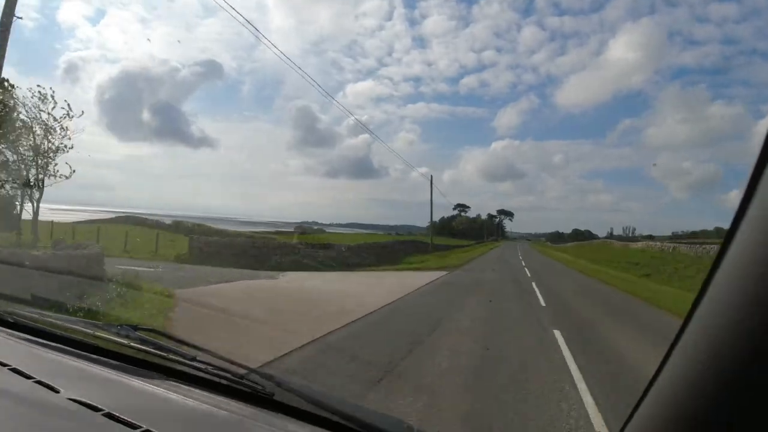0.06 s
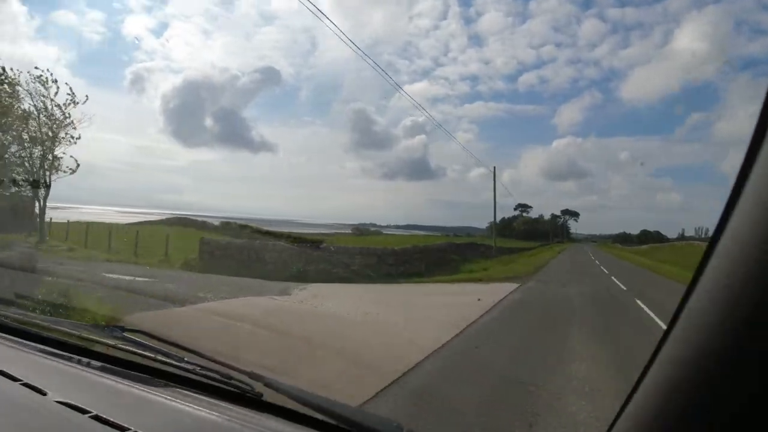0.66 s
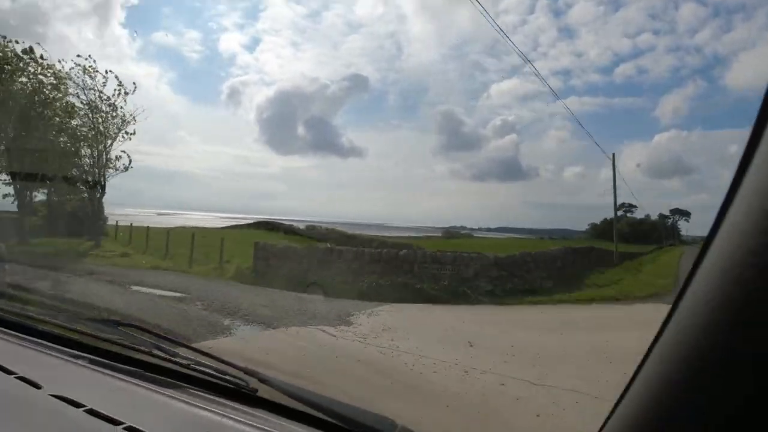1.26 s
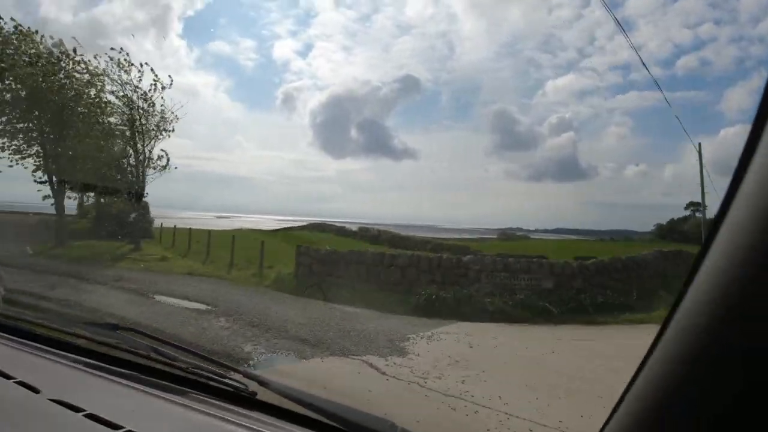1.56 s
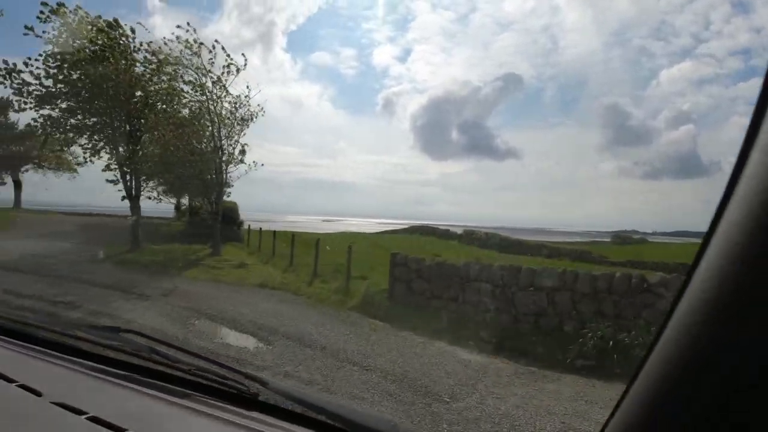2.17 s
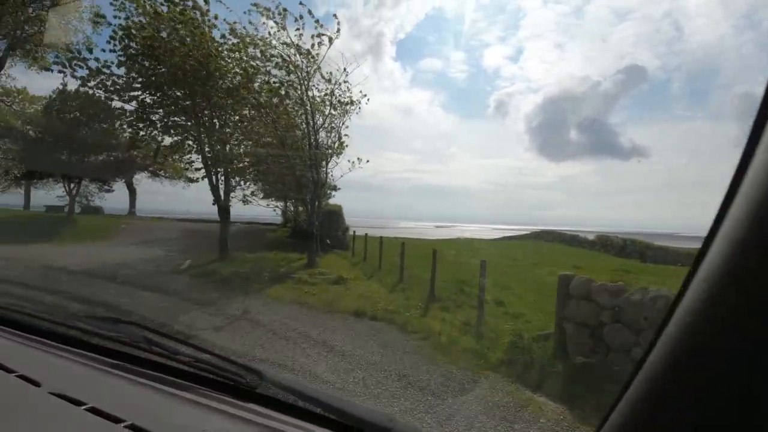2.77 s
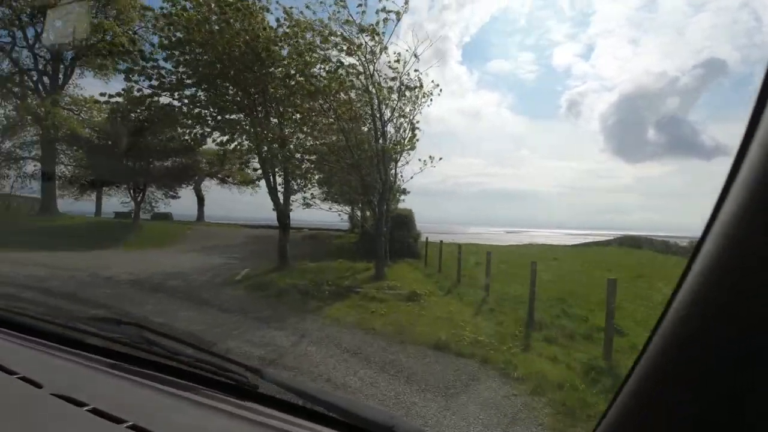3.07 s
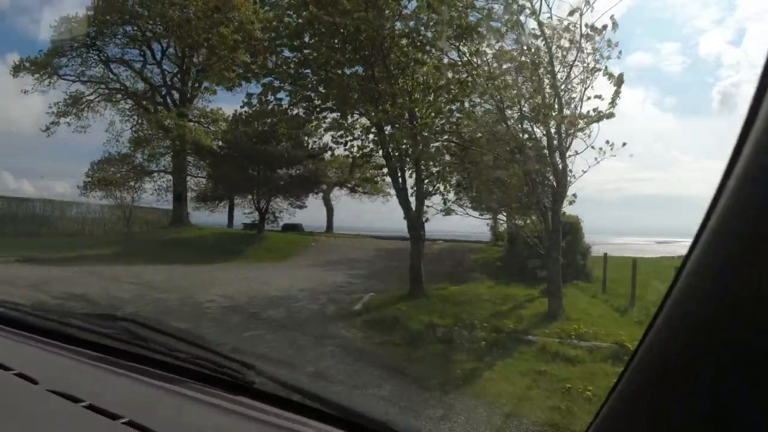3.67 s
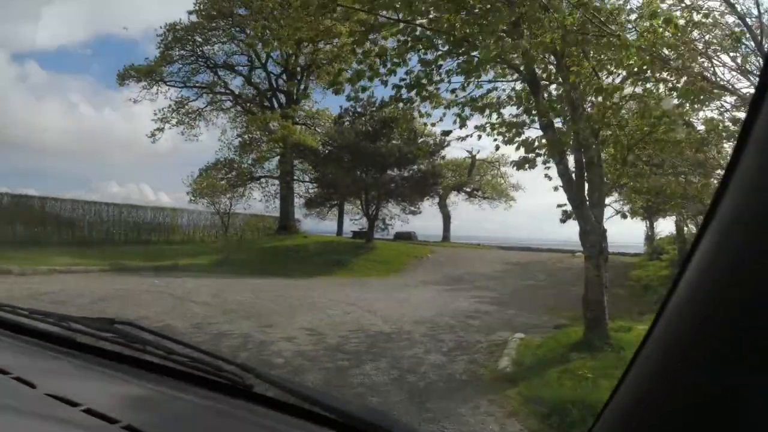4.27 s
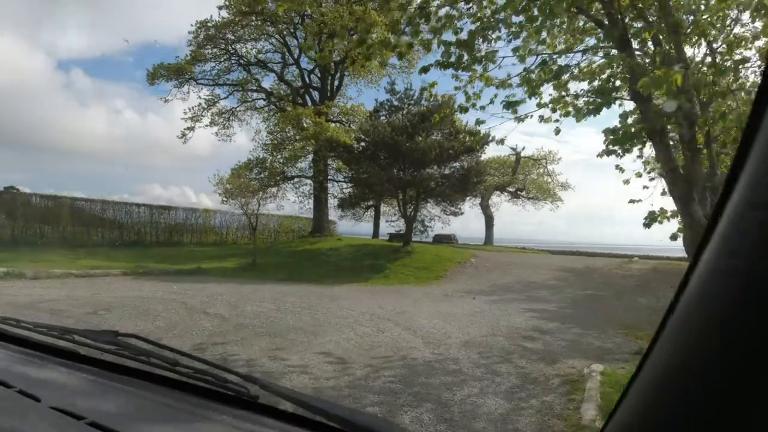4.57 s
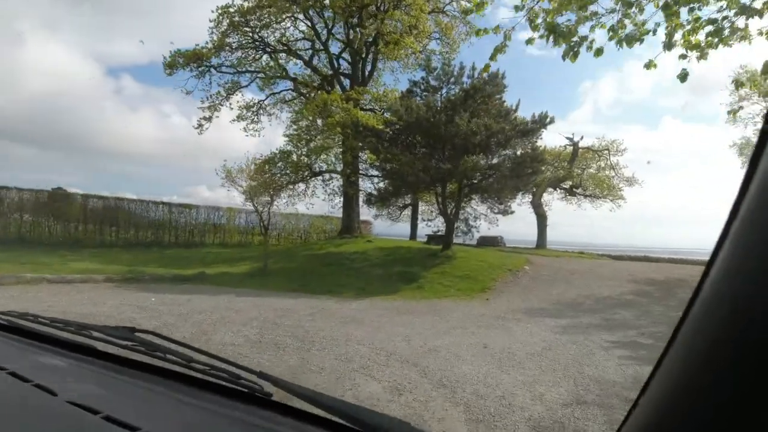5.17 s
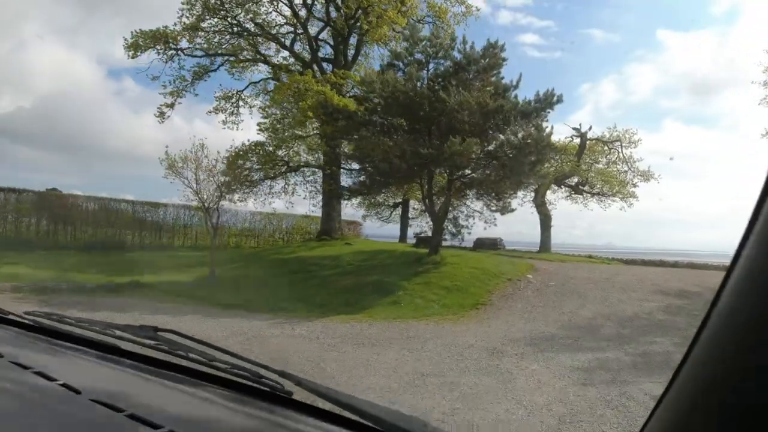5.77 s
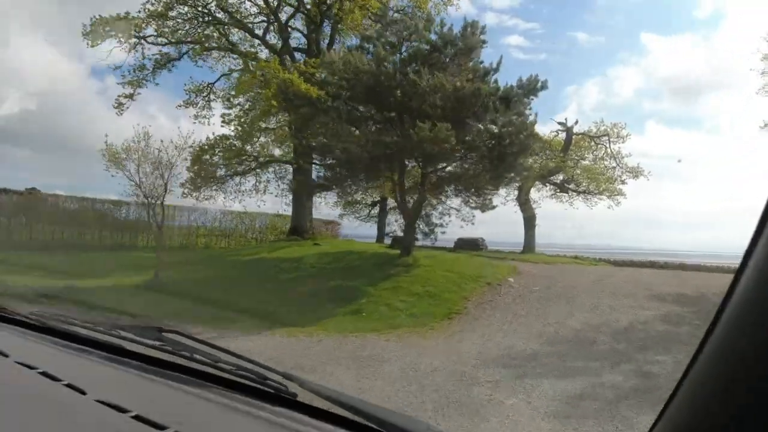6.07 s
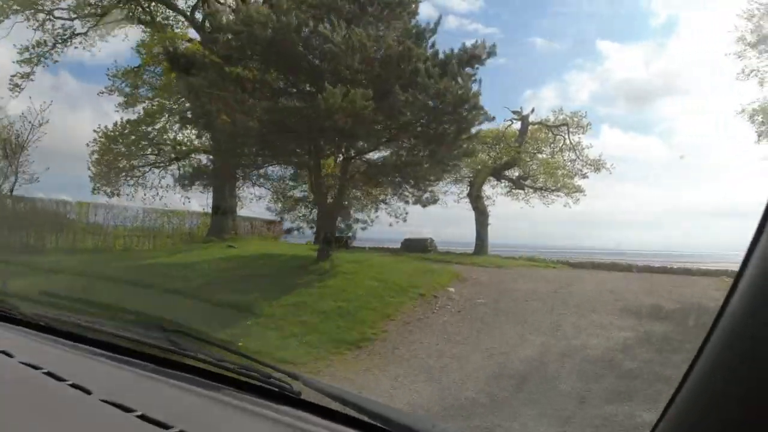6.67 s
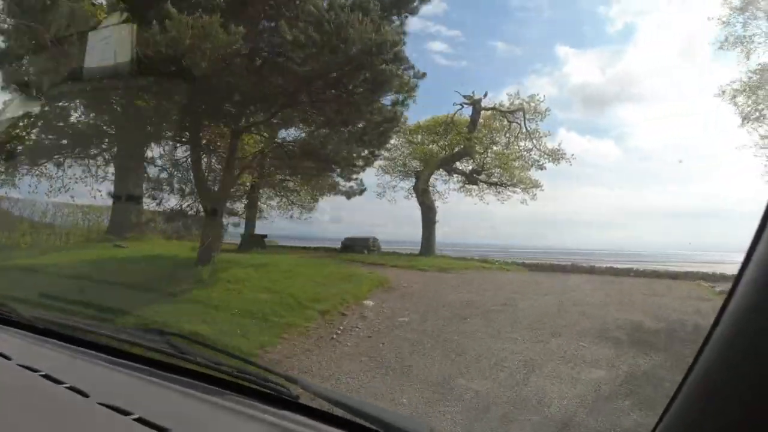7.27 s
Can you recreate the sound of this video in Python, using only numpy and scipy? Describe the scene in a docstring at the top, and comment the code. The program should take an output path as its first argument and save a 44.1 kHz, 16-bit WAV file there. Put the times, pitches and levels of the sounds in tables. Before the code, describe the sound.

A van rolls slowly from a road onto a gravel car park, heard from the dashboard. The idling engine hums under a low tyre rumble, with light grit and a few snapping stones. Then potholes boom through the body, the gravel crunches louder, stones knock on the underside and the trim squeaks. After the hardest knocks the engine hum sinks, while more jolts, faint chinks and a chattering loose fitting carry on.

```python
"""Inside a campervan that coasts off a tarmac road and rolls slowly over a gravel car park.
At first the idling engine hums under the tyre rumble, with light grit and a few snapping stones.
From 2.7 s potholes shake and boom the body; the gravel swells, stones knock on the underside,
small things rattle and the trim squeaks. After the hardest knocks, near 4.8 s, the engine hum
sinks, more jolts follow, small things chink and a loose fitting chatters in runs to the end."""
import sys
import numpy as np
from scipy import signal
from scipy.fft import rfft, irfft
from scipy.io import wavfile
from scipy.ndimage import uniform_filter1d

SR = 44100
rng = np.random.default_rng(int(sys.argv[2]) if len(sys.argv) > 2 else 0)


def master_out(mix):
    """Clip the mix to full scale and print it as 16-bit PCM to the path in sys.argv[1]."""
    frames = np.transpose(np.atleast_2d(mix))
    ceiling = np.clip(frames, -1, 1)
    pcm = np.round(ceiling * 32767).astype(np.int16)
    wavfile.write(sys.argv[1], SR, pcm)


N = 326781
TIME = np.arange(N) / SR
SNAP_RISE_S, EDGE_HZ = 0.0005, 15900  # attack of a stone's snap; upper limit of the band

# Spectrum of a snapping stone. Each row: frequency in Hz, spectral level in dB.
SNAP_SPECTRUM = [(2000, -6), (3500, -10.5), (5200, -9.5), (6300, -7.5), (7500, -5.5), (8500, -7.5),
                 (10000, -11), (12500, -21.5), (15500, -42)]


def road():
    """Random forcing: the tyres shake the floor, which drones at its resonances, over a faint hiss."""
    # Course of the rumble. Each row: time in seconds, level in dB.
    levels = [(0.0, -44.5), (2.62, -47), (2.79, -40), (3.12, -45.5), (3.44, -41.5), (4.93, -44),
              (5.24, -45.5), (5.59, -45), (7.41, -48)]
    # Spectra of the rumble and of the cabin's hiss. Each row: frequency in Hz, spectral level in dB.
    rumble_spectrum = [(12, -5.5), (22, 9.5), (32, 0), (50, -8), (70, -2.5), (100, -4), (150, -1),
                       (200, -6.5), (265, -10), (340, -14), (470, -21), (580, -23.5), (900, -33.5),
                       (1500, -64.5)]
    hiss_spectrum = [(200, 9), (2000, 5), (3500, -36), (6000, -19), (8000, -14.5), (10000, -16.5),
                     (12500, -16.5), (13500, -42), (16000, -29)]
    # Resonances of tyres and floor. Each row: frequency in Hz, width in Hz, lift in dB.
    drones = [(191.7, 6, 5), (222, 3.2, 1), (270, 12, 3.5), (370, 14, 5), (522, 52, 4)]
    level_db = curve(levels) + drift(10)
    rumble = evened(lifted(coloured(rng.standard_normal(N), rumble_spectrum), drones))
    hiss = coloured(rng.standard_normal(N), hiss_spectrum)
    return gain_of(level_db) * rumble + gain_of(-74.5) * hiss


def potholes():
    """Shock excitation: a wheel drops, the body heaves on its springs and the panels boom."""
    # Each row: start in seconds, boom length in seconds, pitch in Hz, boom in dB, heave in dB.
    jolts = [(0, 0.04, 62, -33, -30.5), (2.71, 0.025, 191.4, -24.5, -50), (2.732, 0.042, 237, -27.5, -41),
             (2.748, 0.049, 138.3, -23.5, -27), (2.79, 0.053, 191.7, -31, -28),
             (2.804, 0.17, 103, -29.5, -24.5), (2.899, 0.055, 65.4, -58, -25), (2.953, 0.04, 102, -55, -26),
             (3.301, 0.2, 193.2, -41, -53), (3.432, 0.063, 90.4, -31.5, -15), (3.713, 0.043, 102, -38, -19),
             (4.968, 0.057, 70, -27.5, -27), (5.1, 0.064, 143, -39, -19), (5.235, 0.05, 93.8, -28, -39),
             (5.25, 0.036, 173.7, -31, -18.5), (5.284, 0.14, 173.7, -43.5, -30),
             (5.396, 0.057, 169.2, -35.5, -50), (5.719, 0.019, 185, -38.5, -59),
             (6.08, 0.52, 176, -47, -29), (6.23, 0.069, 153.4, -36, -17.5), (6.288, 0.17, 50.7, -33.5, -26),
             (6.401, 0.1, 50, -36, -31)]
    # Modes of the body panels. Each row: frequency in Hz, width in Hz, level in dB.
    panels = [(67, 25, 17.5), (107, 64, -1.5), (187.5, 9.8, 7.5), (203, 8.5, 11.5), (267, 35, -14)]
    spring_hz, heave_s, heave_lag_s = 24.2, 0.1, 0.0309
    hop_hz, hop_gain = 47, gain_of(-14)  # the wheel hops faster and less strongly than the body
    sag_per_s = 0.99  # fall of the boom's pitch, as a share of its starting value
    out, t = np.zeros(N), np.arange(SR // 2) / SR
    for start, length, hz, boom_db, heave_db in jolts:
        since = TIME - start - heave_lag_s
        sway, hop = (sine(rate * since) for rate in (spring_hz, hop_hz))
        window = np.cos(np.pi * np.clip(since / heave_s, -0.5, 0.5)) ** 2
        out += gain_of(heave_db) * window * (sway + hop_gain * hop) / (1 + hop_gain / 2)
        envelope = swell(t, length, 0.25)
        tone = sine(hz * t * (1 - sag_per_s * t / 2))
        rumble = band(ringing(rng.standard_normal(len(t)), panels), hz, 0.65, 1.23)
        boom = (tone + 0.69 * rumble) * envelope
        add(out, start, gain_of(boom_db) * boom * np.linalg.norm(envelope) / np.linalg.norm(boom))
    return out


def gravel_db():
    """Common excitation: the moving gravel sets the level of grit, clatter, pebbles and buzz."""
    # Gravel moving under the tyres. Each row: time in seconds, level in dB.
    levels = [(0.0, -58.5), (0.52, -67.5), (1.38, -62.5), (2.56, -67.5), (2.85, -56.5), (3.26, -62.5),
              (3.63, -50), (3.8, -54.5), (3.98, -59), (5.34, -59), (5.7, -57), (5.92, -59.5), (7.41, -61.5)]
    return curve(levels)


def grit():
    """Shot noise: countless stones click under the tread, some smeared by the cabin's reverberation."""
    # Spectrum of the grit. Each row: frequency in Hz, spectral level in dB.
    spectrum = [(250, 10), (500, 12.5), (850, -2), (1200, 2), (1650, -5.5), (2400, -10), (3300, -11),
                (5300, -14.5), (7500, -23), (10000, -37), (14000, -43)]
    t = np.arange(2048) / SR
    smear = rng.standard_normal(len(t)) * np.exp(-t / 0.0064)
    coarse = signal.oaconvolve(grains(N, per_s=1100, spread_db=1.0), smear)[:N]
    fine = grains(N, per_s=9000, spread_db=0.98)
    level_db = gravel_db() + 5 + 3.65 * drift(31)
    return gain_of(level_db) * coloured(1.44 * evened(coarse) + fine, spectrum)


def snaps():
    """Impulse response: a pinched stone snaps out in its own bright modes and rings the underside."""
    # Each row: start in seconds, level in dB, relative level of the dull body in dB, pitch in Hz.
    stones = [(0.0807, -53.5, -9, 7640), (0.808, -55.5, -4, 7440), (1.181, -61, -14, 7250),
              (1.3927, -62.5, 12.5, 8900), (1.539, -54, -3, 8000), (2.265, -52.5, -12, 7600),
              (2.44, -58, -20, 7200), (2.4577, -38, -23, 7600), (2.637, -61, 0, 6950),
              (2.8541, -45.5, -34, 7900), (2.9563, -39.5, -19, 6020), (2.9936, -50, -3, 7500),
              (3.394, -59, 14, 6440), (3.723, -50.5, 0, 7400), (3.975, -44.5, -23, 6100),
              (3.984, -38.5, -24, 6360), (4.817, -41.5, 3.5, 5500), (4.8308, -34, 6, 5820)]
    # Modes of a stone. Each row: multiple of its pitch, level in dB.
    stone_modes = [(0.68, 2), (0.88, 5.5), (1, 1.5), (1.13, 3), (1.5, -0.5), (1.85, -4)]
    # Modes of the underside. Each row: frequency in Hz, level in dB, seconds to fall by 60 dB.
    underside = [(616, 1, 0.069), (910, -16.5, 0.069), (1003, -2, 0.068), (1170, -6, 0.051),
                 (1362, -4, 0.062), (1620, -9, 0.047), (1820, -6, 0.04), (2240, -4, 0.055),
                 (2534, -14, 0.034), (3350, -7, 0.04)]
    # Spectrum of the dull thud. Each row: frequency in Hz, spectral level in dB.
    thud_spectrum = [(250, -39), (480, -4), (620, -15), (900, -4), (1400, -9.5), (2300, -3), (3000, -22),
                     (5000, -17.5), (9000, -32)]
    out, t = np.zeros(N), np.arange(8192) / SR
    for start, db, body_db, pitch_hz in stones:
        crack_noise, body_noise = rng.standard_normal((2, len(t)))
        modes = [(pitch_hz * ratio * rng.uniform(0.933, 1.03), 400, mode_db)  # no two stones are alike
                 for ratio, mode_db in stone_modes]
        crack = coloured(ringing(crack_noise, modes), SNAP_SPECTRUM)
        crack *= strike(t, SNAP_RISE_S, 0.0076, -15.5, 0.014)
        cabin_wash = gain_of(-32.5) * coloured(body_noise, SNAP_SPECTRUM) * swell(t, 0.042, 0.7)
        thud = coloured(body_noise, thud_spectrum) * strike(t, 0.00025, 0.0097, -6.5, 0.013)
        ring = sum(gain_of(mode_db - 60 * t / t60) * sine(hz * t) for hz, mode_db, t60 in underside)
        body = 0.61 * thud + 0.59 * ring * (1 - np.exp(-t / SNAP_RISE_S))
        add(out, start, gain_of(db) * (crack + cabin_wash + gain_of(body_db) * body))
    return out


def knocks():
    """Damped vibration: a stone hits the underside with a rasp and excites the panel's main mode."""
    # Each row: start in seconds, level in dB, frequency of the mode in Hz.
    hits = [(1.4256, -36, 1010), (1.626, -46.5, 1430), (2.081, -54, 795), (2.474, -41, 1000),
            (2.635, -42.5, 1066), (2.671, -46.5, 910), (3.032, -44.5, 1000), (3.135, -55, 950),
            (3.212, -50, 830), (3.395, -45, 1250), (3.441, -45, 1100), (3.532, -43, 1404),
            (3.621, -38.5, 2220), (3.672, -40, 1740), (3.691, -51, 1460), (3.9518, -45, 1010),
            (4.02, -37.5, 940), (4.047, -40.5, 916), (4.072, -41, 2000), (4.219, -41, 796), (4.3, -49, 943),
            (4.51, -42.5, 965), (4.551, -49, 900), (4.682, -51, 940), (4.712, -45, 1420), (4.819, -30, 870),
            (4.833, -28, 1377), (4.868, -41, 1570), (4.428, -47, 1640), (5.432, -43, 1580),
            (5.446, -38, 1600), (5.86, -45, 1590), (5.874, -41.5, 1740), (7.007, -56, 1690),
            (7.06, -42, 1630), (7.204, -50, 1700), (7.365, -50, 1740)]
    out, t = np.zeros(N), np.arange(8192) / SR
    for start, db, hz in hits:
        rasp = band(rng.standard_normal(len(t)), hz, 1.0, 1.5) * strike(t, 0.0021, 0.0022, -17.5, 0.044)
        ring = np.sin(2 * np.pi * hz * t) * strike(t, 0.00067, 0.0039, -32, 0.029)
        add(out, start, gain_of(db) * (rasp + gain_of(2) * ring))
    return out


def chatter():
    """Intermittent contact: a loose fitting buzzes, rocks on its seat and clacks once in each swing."""
    # Each row: first and last clack of a run in seconds, then their levels in dB.
    runs = [(0.016, 0.207, -46, -57.5), (1.574, 1.722, -52.5, -61.5), (3.305, 3.367, -54.5, -51),
            (3.426, 3.581, -45, -46), (3.629, 3.69, -43.5, -49), (4.014, 4.121, -45.5, -47.5),
            (4.445, 4.644, -55, -55), (4.731, 4.773, -57.5, -54.5), (5.001, 5.292, -55.5, -54),
            (5.375, 5.634, -52, -46), (5.753, 5.807, -51, -47.5), (5.856, 5.997, -46.5, -52),
            (6.152, 6.209, -54.5, -54), (6.363, 6.416, -55.5, -59), (6.554, 6.61, -51, -51.5),
            (6.75, 6.89, -56, -55.5), (7.001, 7.104, -51.5, -47.5), (7.234, 7.378, -55.5, -62.5)]
    # Modes of the fitting. Each row: frequency in Hz, width in Hz, level in dB.
    modes = [(1185, 85, 3.5), (1385, 210, -1.5), (1641, 71, 1), (2145, 77, 0.5), (2850, 380, -7.5),
             (4880, 740, -9.5), (5340, 160, -4.5), (6960, 240, -14.5)]
    rocks_per_s, landing_s, variation = 19.6, 0.002, 0.69
    t = np.arange(4096) / SR
    contact = gain_of(gravel_db() - 9.5 + 2 * drift(27)) * rng.standard_normal(N)  # the buzz
    shared_ring = evened(irfft(np.exp(2j * np.pi * rng.random(len(t) // 2 + 1))))
    for first, last, first_db, last_db in runs:
        for along in np.linspace(0, 1, round((last - first) * rocks_per_s) + 1):
            envelope = 1.82 * strike(t, 0.0013, 0.0067 * rng.uniform(0.91, 1.0), -18.5, 0.047)
            clack = evened(shared_ring + variation * rng.standard_normal(len(t)))
            db = first_db + along * (last_db - first_db)
            add(contact, first + along * (last - first) + landing_s, gain_of(db) * envelope * clack)
    return np.std(contact) * band(ringing(contact, modes), 2580, 2.37, 1.63)


def crunches():
    """Granular slip: a patch of gravel gives way in a dense shower of clicks."""
    # Each row: start in seconds, length in seconds, centre frequency in Hz, level in dB.
    patches = [(0, 0.051, 3770, -57), (0.87, 0.024, 2750, -57.5), (0.995, 0.022, 3220, -66),
               (1.386, 0.1, 1640, -54), (1.806, 0.018, 3720, -58.5), (1.869, 0.044, 4000, -59.5),
               (2.724, 0.028, 3800, -50.5), (2.728, 0.036, 1040, -50), (3.126, 0.074, 786, -49.5),
               (3.409, 0.1, 860, -50), (3.516, 0.046, 740, -55), (3.613, 0.054, 2910, -48.5),
               (3.479, 0.088, 2400, -69), (3.619, 0.1, 1050, -49), (4.282, 0.06, 1030, -57.5),
               (5.132, 0.098, 2550, -58.5), (5.439, 0.13, 1680, -43), (5.463, 0.27, 1790, -51.5),
               (7.047, 0.036, 1560, -54)]
    out, t = np.zeros(N), np.arange(SR // 2) / SR
    for start, length, hz, db in patches:
        shower = band(grains(len(t), per_s=2000, spread_db=0.67), hz, 0.98, 2.57)
        add(out, start, gain_of(db) * shower * swell(t, length, 0.31))
    return out


def clatter():
    """Convolution: flung stones tap four wheel arches, each with its own dull impulse response."""
    hits_per_s, ring_s = 24, 0.006
    t = np.arange(2048) / SR
    hits = rng.uniform(0.24, 1, (4, N)) * (rng.random((4, N)) < hits_per_s / SR)
    rings = rng.standard_normal((4, len(t))) * np.exp(-t / ring_s)
    taps = signal.oaconvolve(hits, rings, axes=1).sum(0)[:N]
    return gain_of(gravel_db() - 4.5) * band(taps, 790, 0.93, 1.84)


def engine():
    """Harmonic series: the idling engine sounds wavering orders of its firing rate, beside two hums."""
    # Idle speed. Each row: time in seconds, firings per second.
    idle = [(0, 29), (.5, 29.2), (1.1, 28.6), (1.8, 28.3), (2.5, 28.4), (4.3, 28), (7.41, 28.6)]
    # Course of the hum in the cabin. Each row: time in seconds, level in dB.
    levels = [(0, -47.5), (1.8, -48.5), (2.5, -48), (4.3, -50), (5.6, -55), (7.41, -53.5)]
    # Engine orders. Each row: multiple of the firing rate, relative level in dB.
    orders = [(1, -5), (2, -5.5), (3, 1), (4, -3.5), (5, -9), (7, -15), (8, -10.5), (16, -20), (17, -16.5)]
    # Steady tones beside the orders. Each row: frequency in Hz, relative level in dB.
    hums = [(192.5, -10.5), (480.5, -24.5)]
    firings = np.cumsum(curve(idle) * (1 + 0.003 * drift(6))) / SR
    hum = sum(gain_of(db + 1.5 * drift(0.81)) * sine(order * firings) for order, db in orders)
    hum += sum(gain_of(db) * np.sin(2 * np.pi * hz * TIME + 1.37 * drift(2.2)) for hz, db in hums)
    return gain_of(curve(levels)) * hum


def squeaks():
    """Stick-slip friction: trim rubs on trim, its unsteady pitch climbing as the rub tightens."""
    # Each row: start in seconds, length in seconds, pitch in Hz, level in dB, ratio of scrape to tone.
    rubs = [(0.404, 0.037, 1600, -68.5, 1.9), (1.406, 0.14, 1765, -62, 0.52), (1.41, 0.057, 2390, -66, 1.2),
            (1.545, 0.034, 4780, -63, 0.28), (3.037, 0.11, 2310, -71, 1.8), (3.303, 0.19, 2300, -69, 1.5),
            (3.419, 0.023, 560, -50, 0.51), (3.533, 0.037, 473, -40.5, 0.48),
            (3.602, 0.032, 516, -48, 0.31), (3.78, 0.032, 710, -50.5, 0.4), (3.96, 0.044, 2460, -62, 2.1),
            (4.058, 0.041, 4770, -71, 3), (5.465, 0.036, 2407, -47.5, 0.64)]
    climb_hz_per_s, wobble_share, stutter_db = 820, 0.003, -0.5
    out, t = np.zeros(N), np.arange(SR // 2) / SR
    for start, length, hz, db, scrape in rubs:
        envelope = swell(t, length, 0.45) ** 2 * gain_of(stutter_db * drift(90, size=len(t)))
        wobble = evened(uniform_filter1d(rng.standard_normal(len(t)), size=200))
        pitch_hz = hz * (1 + wobble_share * wobble) + climb_hz_per_s * t
        tone = np.sin(2 * np.pi * np.cumsum(pitch_hz) / SR)
        rasp = band(rng.standard_normal(len(t)), hz, 0.058, 1.1)
        add(out, start, gain_of(db) * envelope * (tone + scrape * rasp))
    return out


def rattles():
    """Repeated impact: small loose things bounce unevenly and scrape, exciting their resonances."""
    # Each row: start of a shake in seconds, length in seconds, level in dB.
    shakes = [(0.936, 0.027, -69), (3.388, 0.039, -47.5), (3.43, 0.056, -58), (3.655, 0.061, -56.5),
              (5.311, 0.056, -58), (6.254, 0.085, -54), (6.467, 0.058, -57), (6.789, 0.046, -60),
              (7.132, 0.043, -62.5)]
    # Modes of the loose things. Each row: frequency in Hz, width in Hz, level in dB.
    modes = [(1750, 510, 3), (2760, 260, 2), (3510, 220, -1), (4330, 360, 0.5), (5030, 260, 3.5),
             (6400, 500, -10), (8240, 600, -15)]
    bounces_per_s, scrape = 230, 0.8
    out, t = np.zeros(N), np.arange(SR // 2) / SR
    for start, length, db in shakes:
        bounces = np.floor(bounces_per_s * t + 0.44 * drift(120, size=len(t)))
        landings = np.diff(bounces, prepend=0) != 0
        ticks = evened(landings * rng.uniform(0.49, 1, len(t)) * rng.choice([-1, 1], len(t)))
        shaken = (ticks + scrape * rng.standard_normal(len(t))) * swell(t, length, 0.27)
        add(out, start, gain_of(db) * np.std(shaken) * band(ringing(shaken, modes), 3400, 1.6, 1.6))
    return out


def chinks():
    """Inharmonic modes: small hard things touch and give a thin, high chink."""
    # Each row: start in seconds, pitch in Hz, level in dB.
    touches = [(4.868, 11200, -72), (5.02, 9990, -78), (5.344, 8650, -65.5), (5.412, 8680, -68),
               (5.478, 10950, -76), (5.722, 5450, -67), (6.14, 5684, -64.5), (6.138, 9560, -72),
               (6.192, 5670, -60), (6.541, 5620, -62.5), (7.063, 5500, -58.5)]
    # Modes of a chink. Each row: multiple of the pitch, relative level in dB.
    modes = [(1, -1), (1.56, -16), (1.92, -22), (2.555, -28)]
    out, t = np.zeros(N), np.arange(SR // 4) / SR
    envelope = swell(t, length=0.03, peak_share=0.54) ** 2
    for start, pitch_hz, db in touches:
        for ratio, mode_db in modes:
            hz = pitch_hz * ratio
            scrape = band(rng.standard_normal(len(t)), hz, 0.03, 1.1)
            tone = evened(np.sin(2 * np.pi * hz * t) + 1.1 * scrape)
            add(out, start, (hz < EDGE_HZ) * gain_of(db + mode_db) * tone * envelope)
    return out


def pebbles():
    """Random arrivals: small stones tick faintly and independently between the big snaps."""
    ticks_per_s, loudest_db, range_db = 10, -3, 18  # levels relative to the gravel
    out, t = np.zeros(N), np.arange(2048) / SR
    for place, weakness in rng.random((round(ticks_per_s * N / SR), 2)):
        tick = coloured(rng.standard_normal(len(t)), SNAP_SPECTRUM)
        tick *= strike(t, SNAP_RISE_S, 0.007, -13, 0.02)
        add(out, place * N / SR, gain_of(loudest_db - range_db * weakness) * tick)
    return gain_of(gravel_db()) * out


def cabin(x):
    """Cavity resonance: the van's interior favours a few tones and so sounds hollow."""
    # Each row: frequency in Hz, width in Hz, lift in dB.
    resonances = [(753, 113, 6.5), (907, 95, 6), (1475, 220, 4.5), (1626, 190, 2), (2288, 49, 6),
                  (2480, 73, 2.5), (2614, 43, 5.5)]
    return gain_of(-5.5) * lifted(x, resonances)


def gain_of(db):
    """Decibels to an amplitude ratio."""
    return 10 ** (np.asarray(db) / 20)


def evened(x):
    """Normalisation to rms 1."""
    return x / np.sqrt(np.mean(x ** 2) + 1e-20)


def add(mix, start, sound):
    """Superposition: a sound joins the mix at a start in seconds."""
    part = mix[max(round(start * SR), 0):][:len(sound)]
    part += sound[:len(part)]


def curve(points):
    """Linear interpolation of (seconds, value) points over the scene."""
    return np.interp(TIME, *np.transpose(points))


def sine(cycles):
    """Harmonic motion with a random starting phase."""
    return np.sin(2 * np.pi * (cycles + rng.random()))


def drift(rate_hz, size=N):
    """Random fluctuation: low-passed noise of rms about 1."""
    white = rng.standard_normal(N)
    return evened(irfft(rfft(white) / (1 + (bins(white) / rate_hz) ** 4), N))[:size]


def grains(size, per_s, spread_db):
    """Poisson process: sparse clicks of random sign and size."""
    sizes = gain_of(spread_db * np.minimum(rng.exponential(1, size), 4)) * rng.standard_normal(size)
    return evened(sizes * (rng.random(size) < per_s / SR))


def strike(t, rise_s, decay_s, tail_db, tail_s):
    """Double exponential decay: a quick rise, a quick fall and a weaker tail."""
    return (1 - np.exp(-t / rise_s)) * (np.exp(-t / decay_s) + gain_of(tail_db) * np.exp(-t / tail_s))


def swell(t, length, peak_share):
    """Critically damped pulse: it reaches 1 at a share of its length, then dies away."""
    u = t / (length * peak_share)
    return u * np.exp(1 - u)


def bins(x):
    """Fourier frequencies of x, raised by 1 Hz to keep their logarithms finite."""
    return np.fft.rfftfreq(len(x), 1 / SR) + 1


def coloured(x, points):
    """Spectral shaping through (Hz, dB) points, at rms 1."""
    hz, db = np.transpose(points)
    return evened(irfft(rfft(x) * gain_of(np.interp(np.log(bins(x)), np.log(hz), db)), len(x)))


def band(x, hz, octaves, steepness):
    """Band-pass filtering: a hump around hz, at rms 1."""
    away = np.log2(bins(x) / hz) / octaves
    return evened(irfft(rfft(x) * (1 + away ** 2) ** -steepness, len(x)))


def ringing(x, modes):
    """Resonance: x drives (Hz, width in Hz, dB) modes whose powers add, at rms 1."""
    f = bins(x)
    power = sum(gain_of(db) ** 2 / (1 + ((f * f - hz * hz) / (f * width)) ** 2)
                for hz, width, db in modes)
    return evened(causal(x, np.sqrt(power)))


def lifted(x, tones):
    """Resonant emphasis: (Hz, width in Hz, dB) peaks rise from a flat response."""
    f = bins(x)
    lift_db = sum(db / (1 + (2 * (f - hz) / width) ** 2) for hz, width, db in tones)
    return causal(x, gain_of(lift_db))


def causal(x, gain):
    """Minimum-phase filtering: the gain curve rings only after each blow."""
    cepstrum = irfft(np.log(gain + 1e-9), len(x))
    n = np.arange(len(x))
    folded = cepstrum * (np.sign(n) + np.sign(len(x) / 2 - n))
    return irfft(rfft(x) * np.exp(rfft(folded)), len(x))


def scene():
    """Superposition at the dashboard, with the impacts coloured by the cabin."""
    impacts = grit() + clatter() + snaps() + knocks() + crunches() + chatter() + rattles() + pebbles()
    return (road() + engine() + potholes() + cabin(impacts) + squeaks() + chinks())[None]


def record(dry):
    """Low-pass filtering: the microphone loses the highest treble, and the band ends at EDGE_HZ."""
    hz, db = np.transpose([(7000, 0), (10000, -2), (13000, -5), (16000, -13)])
    heard = irfft(rfft(dry) * gain_of(np.interp(bins(dry[0]), hz, db)), N)
    low_pass = signal.firwin(511, EDGE_HZ, window=("kaiser", 9), fs=SR)
    return signal.oaconvolve(heard, low_pass[None], "same")


dry = scene()
out = record(dry)
master_out(out)
```